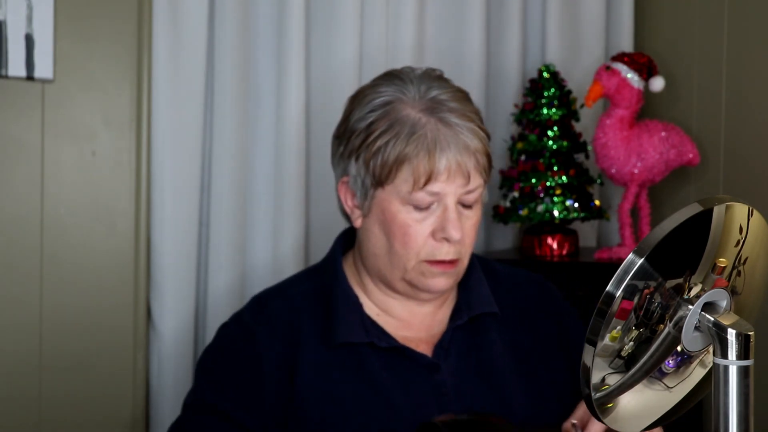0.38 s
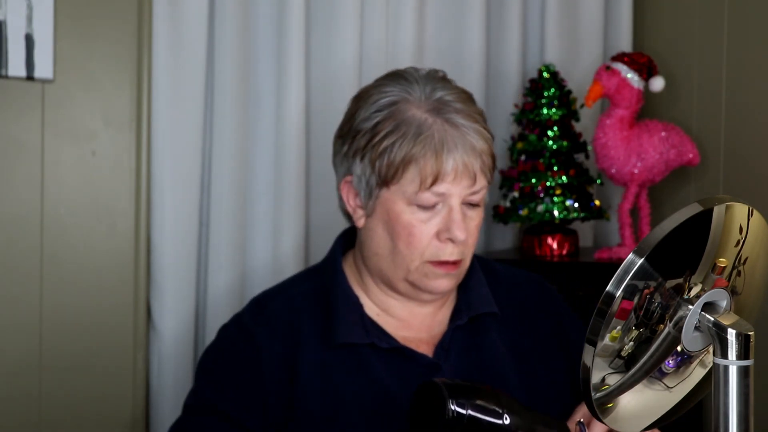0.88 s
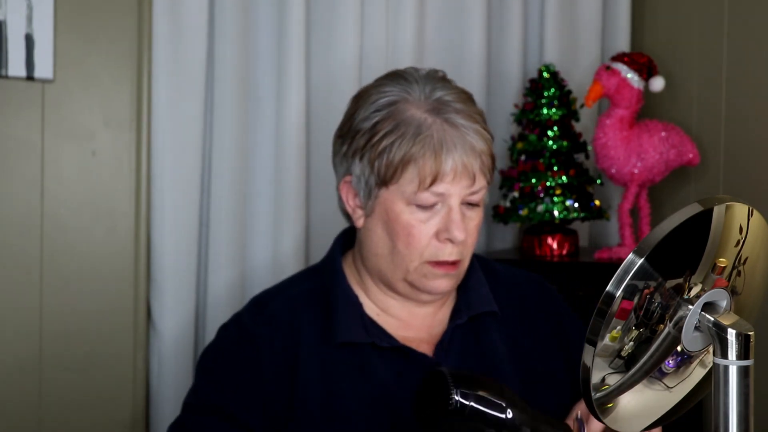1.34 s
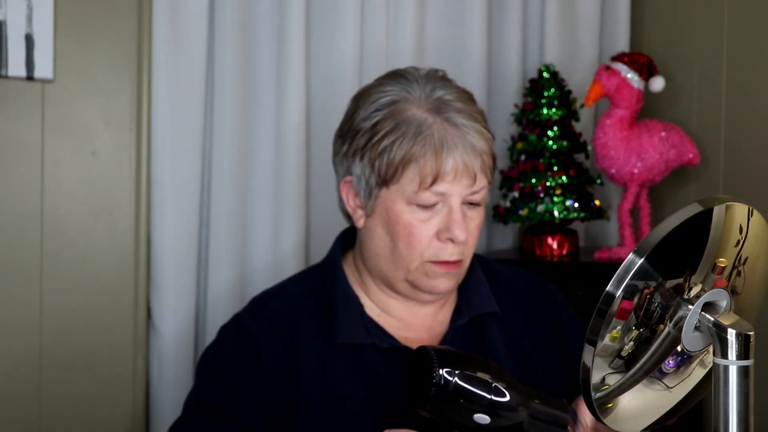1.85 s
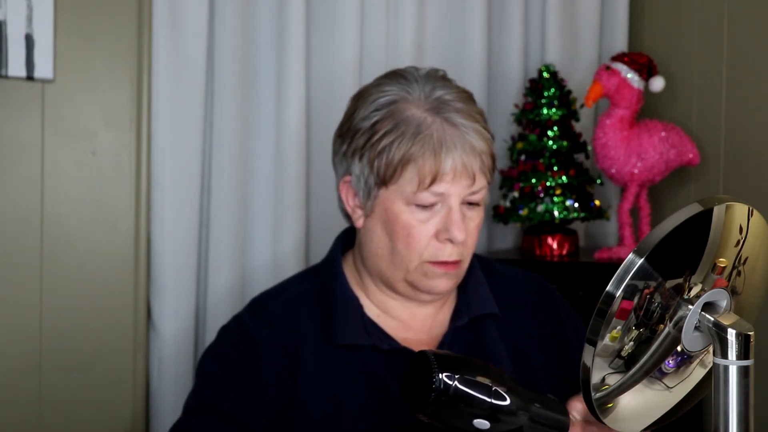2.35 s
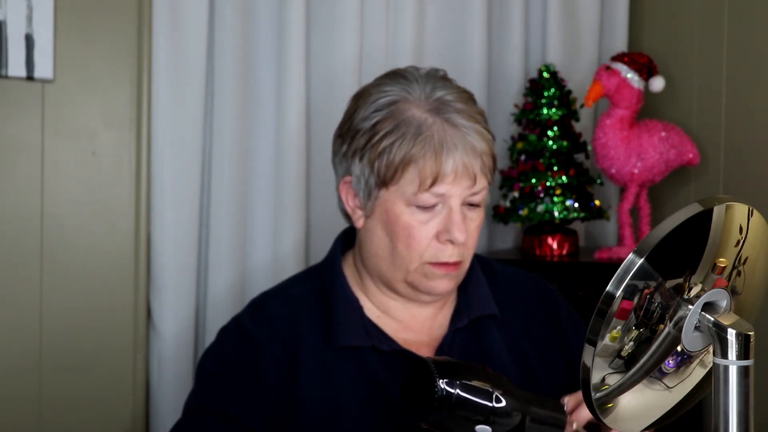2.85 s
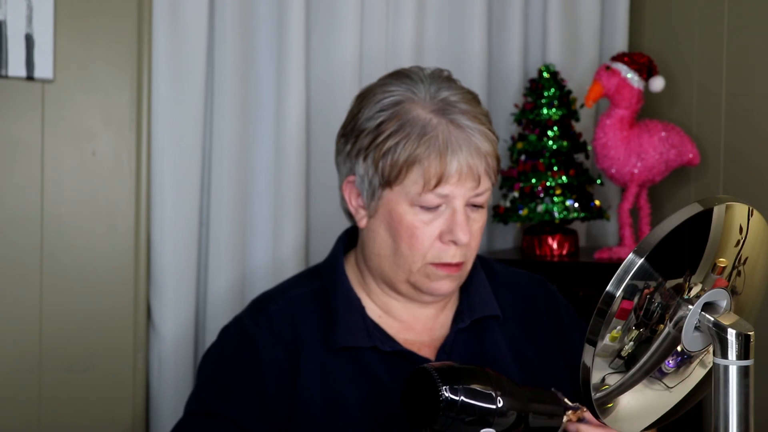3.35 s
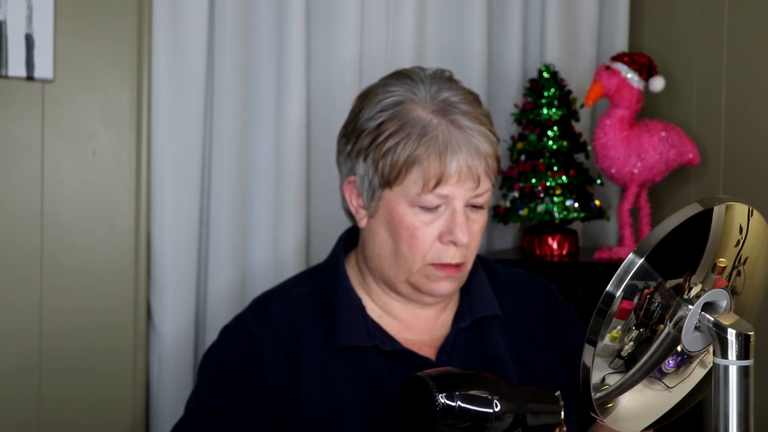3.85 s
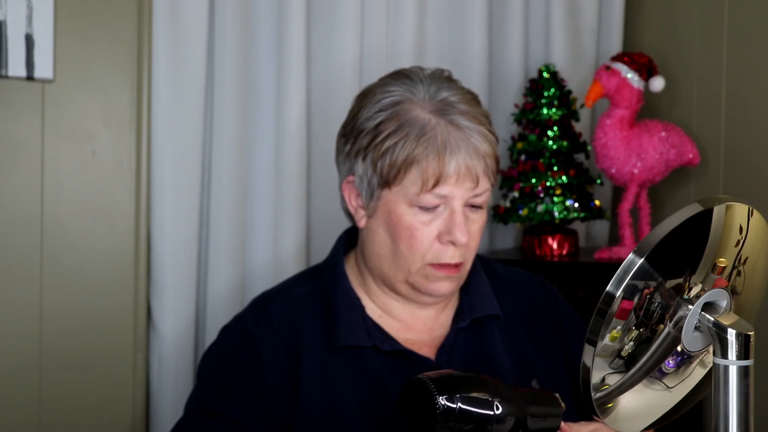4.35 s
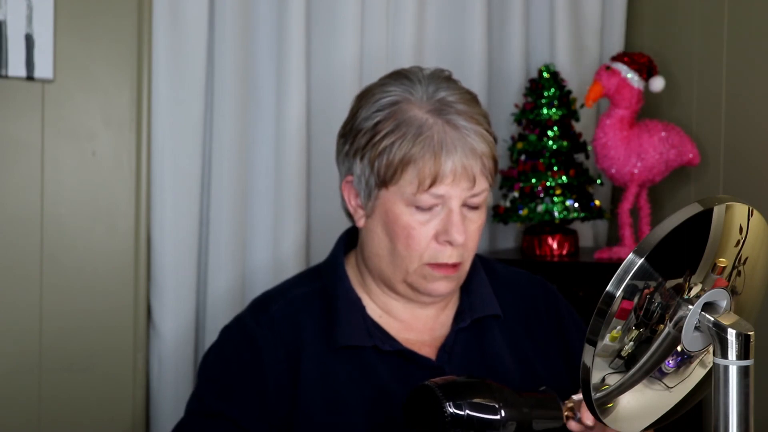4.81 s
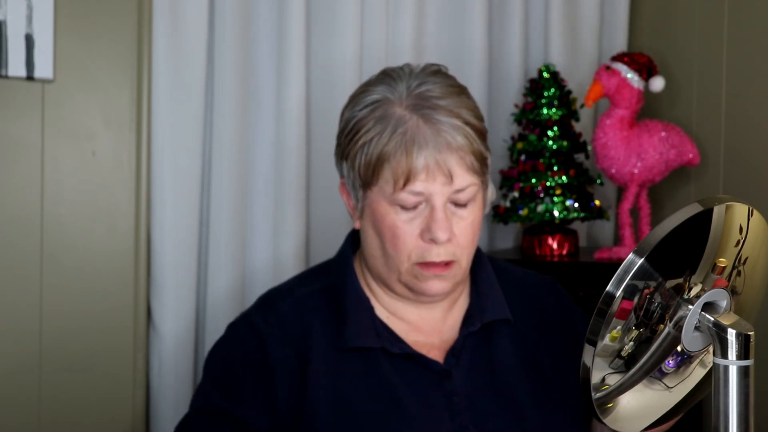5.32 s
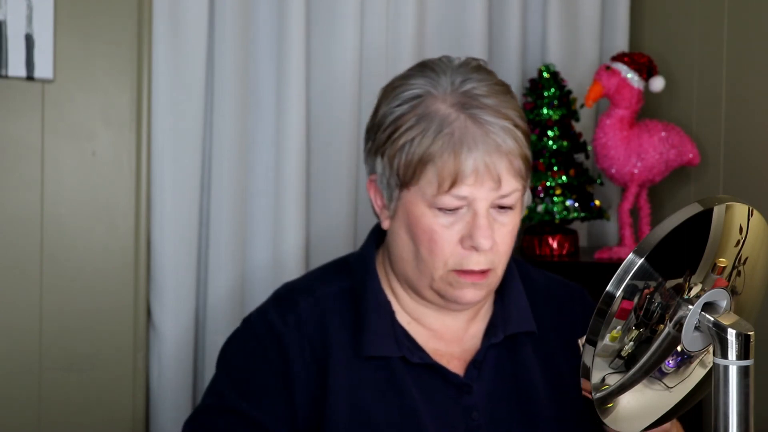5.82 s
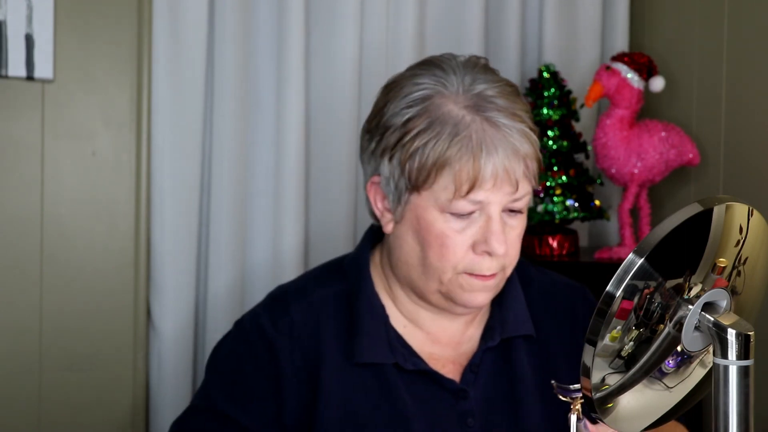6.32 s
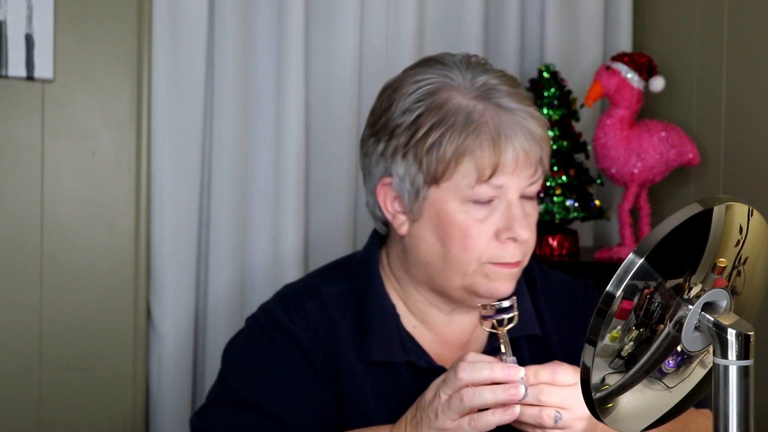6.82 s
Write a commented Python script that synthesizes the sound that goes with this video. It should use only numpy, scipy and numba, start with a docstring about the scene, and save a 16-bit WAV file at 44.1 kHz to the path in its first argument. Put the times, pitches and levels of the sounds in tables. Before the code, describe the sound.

Close in a small furnished room, a hair dryer spins up in a fraction of a second and holds a bright, dense roar with a steady motor whine and slight flutter. Switched off past five seconds, the air dies away steeply, with a bearing chirp and dull thumps as it is set down, then a loud clack on the table. Faint hum, hiss and barely audible metallic pings remain.

```python
"""A hair dryer lurches into motion on a table top in a small furnished room, gathers speed and holds.
Sine partials of shaft, fan blades and motor sing over three bands of shaped noise, the rushing air.
Switched off, it coasts down: hands rumble, a falling tone squeaks, and damped table modes bump.
After a second, fainter squeak comes one hard knock with small taps, then decaying sines tinkle.
Faint house hum and microphone hiss lie beneath; the recorder's gain sinks while the sound is loud."""
import sys
import numpy as np
from scipy import signal
from scipy.fft import rfft, irfft
from scipy.io import wavfile
from scipy.ndimage import uniform_filter1d
from numba import njit

SR = 44100
rng = np.random.default_rng(int(sys.argv[2]) if len(sys.argv) > 2 else 0)


def transcribe(signal):
    """Save signal, clipped to [-1, 1], as a 16-bit WAV file at the path in sys.argv[1]."""
    frames = np.atleast_2d(signal).T
    limited = np.clip(frames, -1, 1)
    pcm = np.round(limited * 32767).astype(np.int16)
    wavfile.write(sys.argv[1], SR, pcm)


def nominal_scale(level):
    """Amplitude ratio for a level in decibels (scalar or array-like)."""
    x = np.asarray(level, float) / 20
    return 10 ** x


N = 305613
T = np.arange(N) / SR
HZ = np.maximum(np.fft.rfftfreq(N, 1 / SR), 1)

# Partials of the shaft and its seven fan blades, before the resonances lift them:
# shaft_multiple, level_db, waver_db, left_minus_right_db
PARTIALS = [(1, -34, 0.5, 2.9), (2, -48.5, 2, 18), (3, -44.5, 1.5, -9), (7, -26.5, 2, 4),
            (8, -33.5, 1, -14.5), (10, -44, 4.5, -17), (14, -27.5, 2.7, 1), (21, -28.5, 2.5, 0.5),
            (27, -45.5, 2.5, 25), (28, -47, 8, -7)]
# Colour of the rushing air, relative: pitch_hz, density_db_per_hz
AIR_COLOUR = [(35, -73), (60, -35.5), (226, -12.5), (279, -10), (404, -15), (476, -13), (644, -13),
              (851, -7.5), (1320, -9.5), (2310, -3), (2850, -4.5), (4140, -2), (8910, -9), (13200, -25),
              (15600, -25.5)]
# Where housing, table and walls lift or dull the dryer: centre_hz, width_hz, lift_db
RESONANCES = [(159, 30, 5.5), (305.5, 15.3, 8.5), (347.5, 17, 8), (488.3, 30.6, 14), (601, 57, 4.5),
              (723, 34.3, 14), (801, 37, 9.5), (852, 41, 7), (913, 15.6, 11.5), (1002, 40, 7.5),
              (1074.6, 21, 9.5), (1216, 8.2, 10.5), (1345, 41, 1.5), (1454, 26, 8.5), (1565, 21, 9.5),
              (1640, 24, 5), (1700, 12.6, 9), (1806, 99, 5), (2176, 27, 5), (2295, 74, 5.5), (2390, 34, 9),
              (2522, 31, 8.5), (2680, 33, 7.5), (3100, 100, 5.5), (3223, 82, 3.5), (3387, 34, 8.5),
              (3512, 44, 6), (3640, 50, 1.5), (4930, 230, -2), (5460, 82, 3)]
# Stereo balance of the air: pitch_hz, left_minus_right_db
AIR_BALANCE = [(60, -5), (110, 7.5), (200, -4.5), (380, -0.5), (700, -1), (1290, -1), (2380, -3),
               (4400, -2.5), (8120, -1.5), (15000, 4)]
# Stereo width of the air: pitch_hz, side_over_mid_db
AIR_WIDTH = [(60, -12), (130, -32), (290, -11), (640, -9.5), (1400, -5.5), (3100, -4.5), (7000, -5.5),
             (15000, -0.5)]
# Strength and decay of the three air bands (low rush, middle rush, hiss): start_db, surge_db,
# switch_off_step_db, speed_loss_borne_db, fade_db_per_db_of_speed_loss, faint_tail_db
AIR_FLOW = [(-11, 6, 1, 2.5, 4.4, -30), (-9.5, 1, -2.5, 1.37, 7.5, -21), (-17, -0.5, -5, 0.85, 7, -22.5)]
# Falling tones of the bearing: loudest_s, pitch_hz there, level_db, swell_db_per_s
BEARING_SQUEAKS = [(5.738, 767, -24, 600), (6.04, 775, -43, 200)]
# Modes of the table top: pitch_hz, level_db, t60_s
TABLE_MODES = [(136.2, -18, 0.43), (160, -21.5, 0.63), (204, -20, 0.64), (295, -24.5, 0.61),
               (351, 0.5, 0.071), (390, -4, 0.058), (421, -18, 0.21), (504, 0.5, 0.028), (602, -1.5, 0.038),
               (698, -12, 0.02), (775, -7.5, 0.025), (920, -9, 0.016), (1120, -0.5, 0.025),
               (1230, -16, 0.018), (1430, -13, .02), (1710, -23, .015), (2150, -21, .015),
               (3101, -19, .015)]
# Blows on the table, before the bass cut: start_s, level_db, contact_ms, crack_over_ring_db
TABLE_KNOCKS = [(5.77, -9, 3.5, -19.5), (5.820, -10.5, 2.2, -17.5), (5.860, -19, 2.6, -30),
                (5.878, -17.5, 2.5, -27), (6.0844, 4, 0.6, -22.5), (6.105, -31, 0.88, -16),
                (6.121, -35, 1.1, -20), (6.131, -12, 1.7, -30)]
# A small metal piece being handled: start_s, pitch_hz, level_db, t60_s
METAL_TINKLES = [(6.316, 11500, -60, .02), (6.578, 4900, -60, .06), (6.590, 4900, -55, .08),
                 (6.598, 7000, -60, .12)]
# Hands moving the dryer and the piece: start_s, length_s, level_db
HAND_MOVES = [(5.34, .38, -57), (5.79, .1, -46), (6.1, .15, -54), (6.62, 0.37, -62)]
# Colour of the room's background, relative: pitch_hz, density_db_per_hz
ROOM_COLOUR = [(15, -41), (25, -18), (66, -11.5), (95, -17), (109, -11), (293, -13), (415, -16),
               (1120, -14.5), (3440, -21), (3730, -26), (4380, -26.5), (13500, -42.5), (15000, -43)]

OFF_S, COAST_S = 5.233, 0.82  # switch-off; time constant of the free rotor's slowing


def on_hz(table):
    """Draw a curve through (pitch_hz, value) points along a log-frequency axis."""
    hz, value = np.transpose(table)
    return np.interp(np.log(HZ), np.log(hz), value)


def walk(rate_hz):
    """Smooth chance with spread 1: held random values, averaged twice."""
    k = int(SR / rate_hz)
    steps = np.repeat(rng.standard_normal(N // k + 1), k)
    smooth = uniform_filter1d(uniform_filter1d(steps, k), k)[:N]
    return smooth / smooth.std()


def wide_noise(colour_db, side_db, level_db):
    """Spectra of left and right noise: a shared part plus an unrelated side part."""
    mid, side = rfft(rng.standard_normal((2, N))) * nominal_scale(colour_db)
    scale = nominal_scale(level_db) / irfft(mid, N).std()
    return scale * (mid + nominal_scale(side_db) * side * np.array([[1], [-1]]))


def glide(peak_s, pitch_hz, level_db, sag_hz_per_s, swell_db_per_s, fade_db_per_s):
    """A slightly unsteady falling tone that swells up to its peak and then fades."""
    pitch = np.clip(pitch_hz - sag_hz_per_s * (T - peak_s), 0.81 * pitch_hz, 1.15 * pitch_hz)
    tone = np.sin(2 * np.pi * np.cumsum(pitch * (1 + 0.0098 * walk(60.0))) / SR)
    swell = swell_db_per_s * np.maximum(peak_s - T, 0)
    fade = fade_db_per_s * np.maximum(T - peak_s, 0)
    return np.sqrt(2) * tone * nominal_scale(level_db - swell - fade)


def lift_db(hz):
    """What the resonances of housing, table and walls add at a frequency."""
    return sum(db / (1 + (2 * (hz - centre) / width) ** 2) for centre, width, db in RESONANCES)


def echoes(x, t60_s, wet_db, low_hz, dull_hz):
    """Direct sound plus a decaying scatter of reflections; the close ports differ in short waves only."""
    t = T[:SR // 2]
    # reflections fade in from 2.4 to 4.8 ms
    decay = 1000 ** (-t / t60_s) * np.clip(t / 0.0024 - 1, 0, 1)
    mid, side = rng.standard_normal((2, len(t))) * decay
    side = signal.lfilter(*signal.butter(1, 900, "high", fs=SR), side)
    band = signal.butter(1, (low_hz, dull_hz), "band", fs=SR)
    tail = signal.lfilter(*band, [mid + side, mid - side])
    tail = tail / tail.std() / np.sqrt(len(t))
    return x + nominal_scale(wet_db) * signal.fftconvolve(x, tail, axes=1)[:, :N]


def motor():
    """Shaft speed, its loss in dB while coasting, and the level of the tones, which need motor current."""
    full_hz = 285.3
    spin_up_hz, spin_up_s = 161, 0.112  # shortfall at the start and how fast it closes
    creep_hz, creep_s = 3, 1.1  # the last, slow part of the shortfall
    tone_start_db, tone_rise_s = -55, 0.055
    tone_hold_s, tone_fade_db_per_s = 0.035, 300
    coasting = np.maximum(T - OFF_S, 0)
    driven_hz = full_hz - spin_up_hz * np.exp(-T / spin_up_s) - creep_hz * np.exp(-T / creep_s)
    shaft_hz = driven_hz * np.exp(-coasting / COAST_S)
    loss_db = 20 / np.log(10) * coasting / COAST_S
    tone_db = tone_start_db * np.exp(-T / tone_rise_s)
    tone_db = tone_db - tone_fade_db_per_s * np.maximum(coasting - tone_hold_s, 0)
    return shaft_hz, loss_db, tone_db


def flow_db(loss_db, start_db, surge_db, step_db, margin_db, power, tail_db):
    """Air level: a quick start with a surge, a step at switch-off, then a steep fade to a faint tail."""
    rise_s, surge_s, tail_power = 0.058, 0.37, 2.07
    step_after_s, step_s = 0.02, 0.023  # the pressure change follows the switch
    start = start_db * np.exp(-T / rise_s) + surge_db * np.exp(-T / surge_s)
    step = step_db * np.clip((T - OFF_S - step_after_s) / step_s, 0, 1)
    fade = step - power * np.maximum(loss_db - margin_db, 0)
    return start + np.maximum(fade, tail_db - tail_power * loss_db)


def rush(loss_db):
    """Turbulent air through the housing, in three bands that fade differently as the fan slows."""
    air = wide_noise(on_hz(AIR_COLOUR) + lift_db(HZ), on_hz(AIR_WIDTH), -15.5)
    air = air * nominal_scale(np.outer([0.5, -0.5], on_hz(AIR_BALANCE)))
    low = 1 / (1 + (HZ / 1150) ** 6)
    high = 1 / (1 + (4800 / HZ) ** 4)
    gust_db = 0.46 * walk(6.83)  # slow random gusts, shared by the bands
    out = 0
    for band, row in zip((low, 1 - low - high, high), AIR_FLOW):
        level_db = flow_db(loss_db, *row) + gust_db + 0.38 * walk(18.0)
        out = out + irfft(air * band, N) * nominal_scale(level_db)
    return out


def whine(shaft_hz, tone_db):
    """Multiples of shaft speed ring the resonances they cross, wavering at random with a rough flicker."""
    turn = 2 * np.pi * np.cumsum(shaft_hz * (1 + 0.001173 * walk(9.0))) / SR
    sway, out = walk(9.0), 0  # one slow sway is shared by all partials
    for k, level_db, waver_db, pan_db in PARTIALS:
        waver = waver_db * (0.5 * sway + 0.5 * walk(14.0) + 0.8 * walk(45.0))
        # the shaft hum starts less faint and fades less steeply than the whine
        swell = nominal_scale(level_db + tone_db * (0.55 if k == 1 else 1) + waver)
        swell = swell * np.repeat(nominal_scale(lift_db(k * shaft_hz[::64])), 64)[:N]
        # phase offset between left and right grows with pitch
        lag = rng.uniform(0, 2 * np.pi) + 0.00028 * k * shaft_hz * np.array([[0.5], [-0.5]])
        pan = nominal_scale(np.array([[pan_db], [-pan_db]]) / 2)
        out = out + np.sqrt(2) * swell * pan * np.sin(k * turn + lag)
    return out


def lurch():
    """The motor lurches into motion with a short falling hum."""
    return glide(0.027, 198, -32, sag_hz_per_s=330, swell_db_per_s=180, fade_db_per_s=180)


def squeaks():
    """The slowing rotor rubs in its bearing: short falling tones."""
    rubs = 0
    for peak_s, pitch_hz, level_db, swell in BEARING_SQUEAKS:
        rubs = rubs + glide(peak_s, pitch_hz, level_db, 1210, swell, fade_db_per_s=1200)
    return rubs * nominal_scale(np.array([[-0.5], [0.5]]))


def knocks():
    """Rounded pushes ring the table top, shorter ones reach higher modes; each contact also cracks."""
    t, out = T[:SR // 2], np.zeros(N)
    crack_band = signal.butter(2, (600, 2400), "band", fs=SR)
    for start_s, level_db, contact_ms, crack_db in TABLE_KNOCKS:
        grip = nominal_scale(0.87 * rng.standard_normal(len(TABLE_MODES)))  # every blow lands on another spot
        ring = 0
        for g, (hz, mode_db, t60_s) in zip(grip, TABLE_MODES):
            ring = ring + g * nominal_scale(mode_db) * 1000 ** (-t / t60_s) * np.sin(2 * np.pi * hz * t)
        push = np.hanning(int(contact_ms * SR / 1000) + 3)
        blow = signal.fftconvolve(ring, push)[:len(t)]
        crack = rng.standard_normal(len(t)) * (np.exp(-t / 0.0015) + 0.3 * np.exp(-t / 0.034))
        crack = signal.lfilter(*crack_band, crack)
        blow = blow / np.abs(blow).max() + nominal_scale(crack_db) * crack / np.abs(crack).max()
        i = int(start_s * SR)
        out[i:i + len(t)] += nominal_scale(level_db) * blow[:N - i]
    # a small board radiates almost no deep bass
    out = signal.sosfilt(signal.butter(6, 130, "high", fs=SR, output="sos"), out)
    return out * nominal_scale(np.array([[0.4], [-0.4]]))


def tinkles():
    """The small metal piece rings: single sines that start at once and die away."""
    out = np.zeros((2, N))
    for start_s, pitch_hz, level_db, t60_s in METAL_TINKLES:
        t = np.maximum(T - start_s, 0)
        out += nominal_scale(level_db) * 1000 ** (-t / t60_s) * np.sin(2 * np.pi * pitch_hz * t)
    return out


def handling():
    """Hand movements as deep noise carried through table and stand."""
    band = signal.butter(2, (45, 85), "band", fs=SR, output="sos")
    rumble = signal.sosfilt(band, rng.standard_normal(N))
    moves = 0
    for start_s, length_s, level_db in HAND_MOVES:
        rise = 300 * np.maximum(start_s - T, 0)  # dB, at 300 dB per s
        fade = 150 * np.maximum(T - start_s - length_s, 0)  # dB, at 150 dB per s
        moves = moves + nominal_scale(level_db - rise - fade)
    return rumble / rumble.std() * moves


def room():
    """Faint house hum and microphone hiss: coloured noise of wavering level."""
    side_db = on_hz([(60, -16), (300, -7), (1200, -5), (4000, 1.0)])
    return irfft(wide_noise(on_hz(ROOM_COLOUR), side_db, -50), N) * nominal_scale(1.7 * walk(5.0))


def scene():
    """Dryer, table and room."""
    shaft_hz, loss_db, tone_db = motor()
    air = echoes(rush(loss_db), 0.25, -17, 900, 7000)
    dryer = air + whine(shaft_hz, tone_db) + lurch()
    contacts = echoes(knocks() + squeaks() + tinkles(), 0.25, -9.0, 184, 2700)
    return dryer + contacts + handling() + room()


@njit
def follow(x, attack, release):
    """Level that rises fast and falls slowly."""
    e, out = x[0], np.empty(len(x))
    for i in range(len(x)):
        e += (x[i] - e) * (attack if x[i] > e else release)
        out[i] = e
    return out


def band_limit(x):
    """A steep low-pass at the top of the band."""
    return signal.sosfilt(signal.butter(12, 15730, fs=SR, output="sos"), x)


def record(dry):
    """Gain control eases loud stretches down by 0.21 dB for each dB above its threshold."""
    threshold_db, attack_s, release_s = -36.5, 0.09, 0.15
    level = uniform_filter1d(np.abs(dry).mean(axis=0), size=441)  # 10 ms average
    loud = follow(level, 1 / (attack_s * SR), 1 / (release_s * SR))
    gain = np.minimum(1, (nominal_scale(threshold_db) / (loud + 1e-9)) ** 0.21)
    return band_limit(dry * gain)


dry = scene()
out = record(dry)
transcribe(out)
```